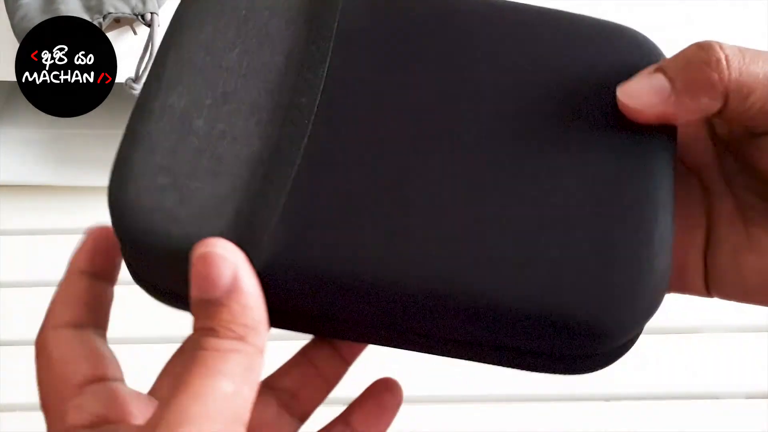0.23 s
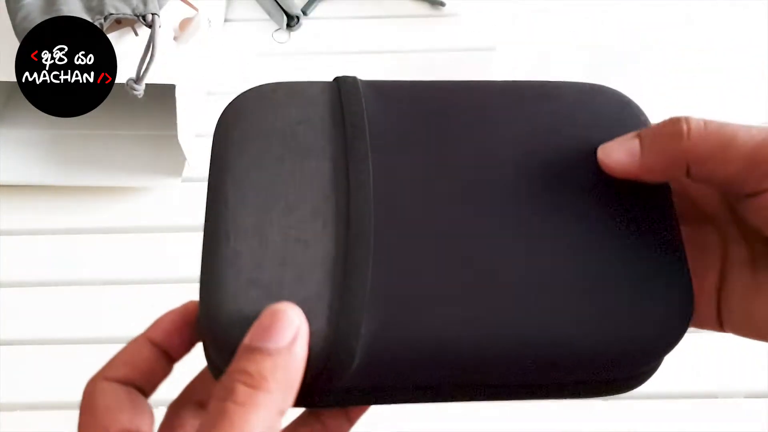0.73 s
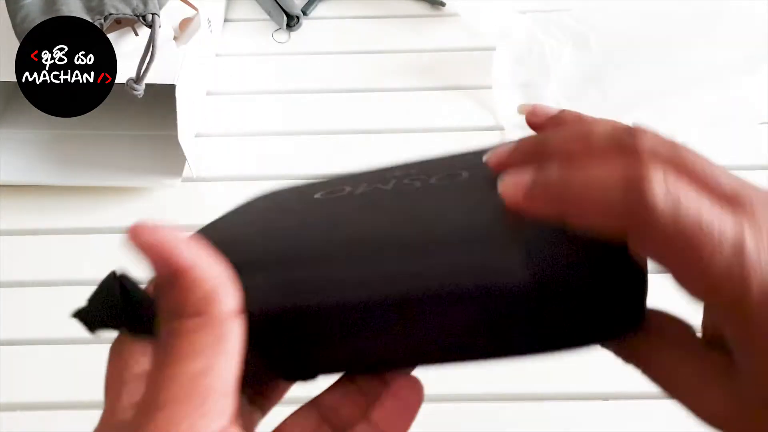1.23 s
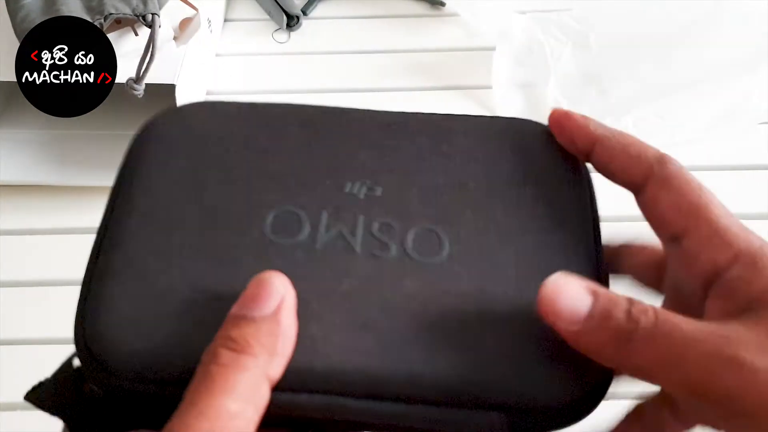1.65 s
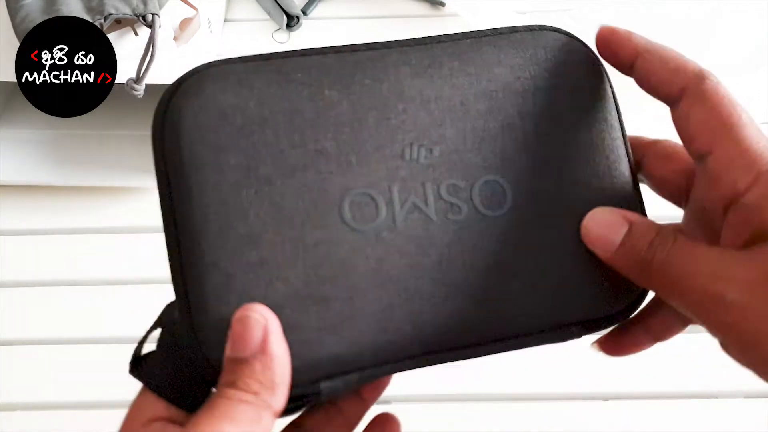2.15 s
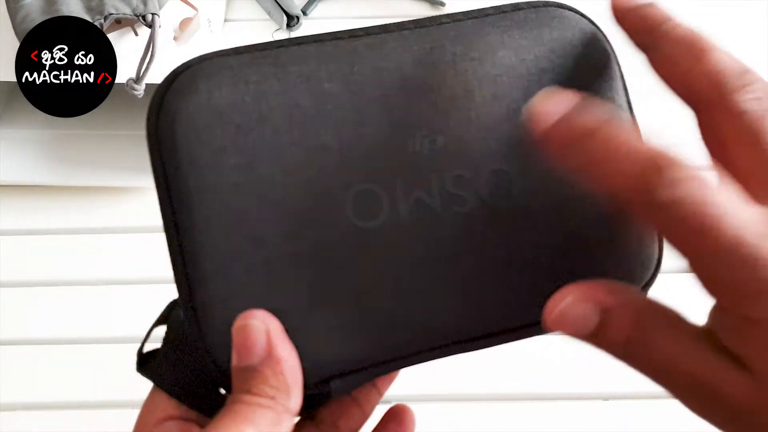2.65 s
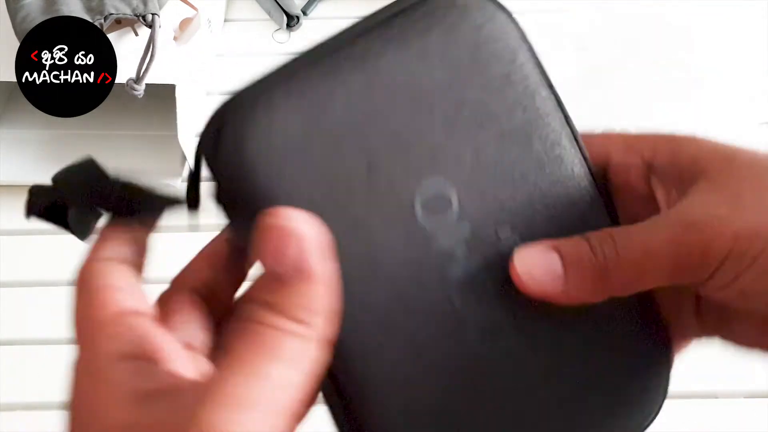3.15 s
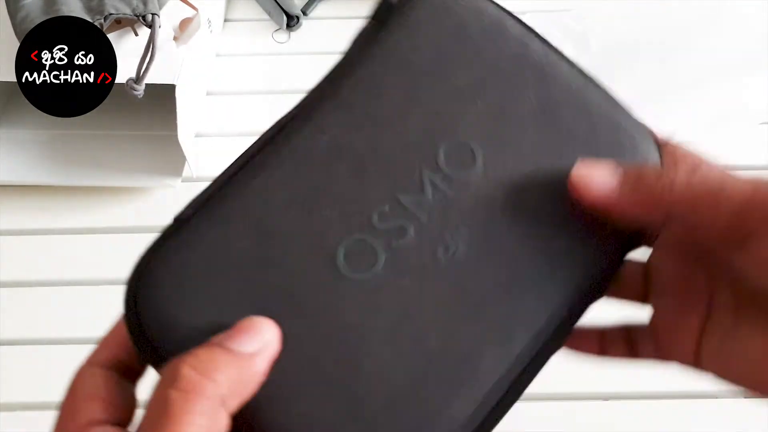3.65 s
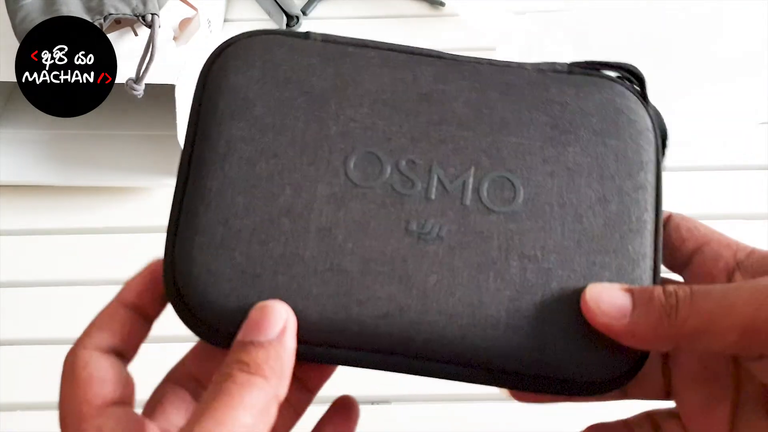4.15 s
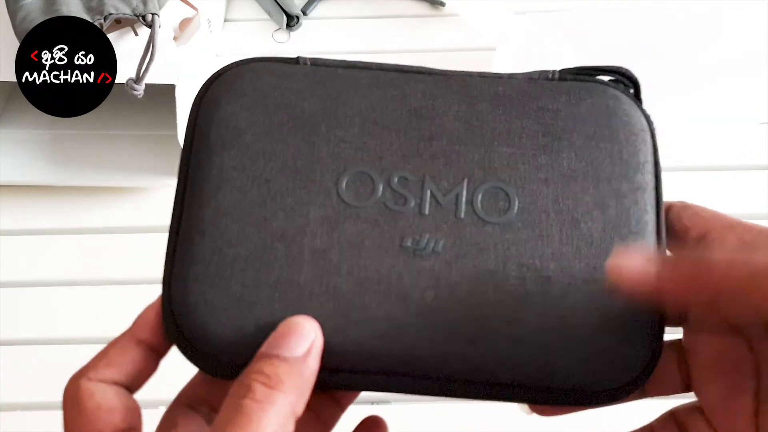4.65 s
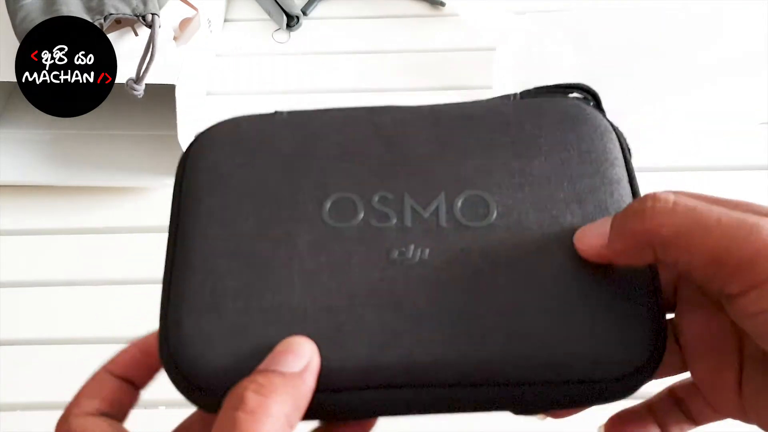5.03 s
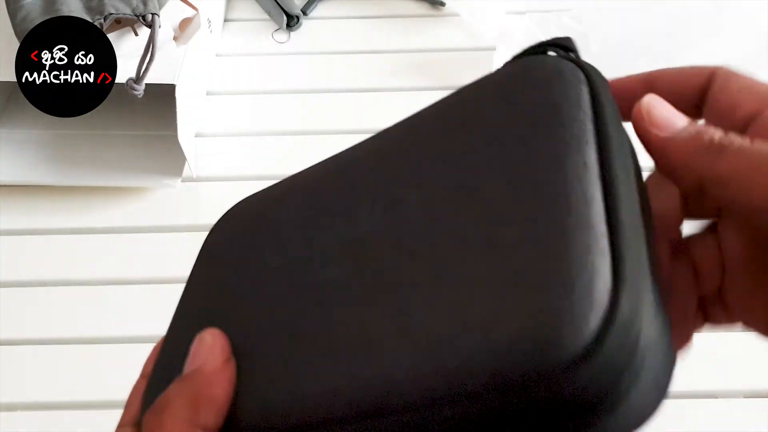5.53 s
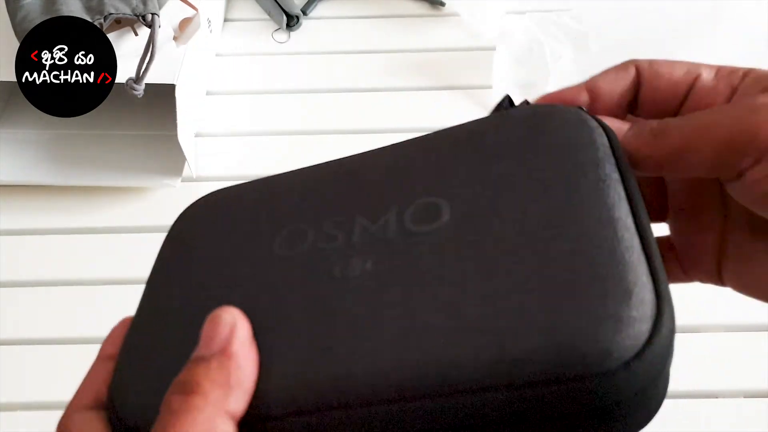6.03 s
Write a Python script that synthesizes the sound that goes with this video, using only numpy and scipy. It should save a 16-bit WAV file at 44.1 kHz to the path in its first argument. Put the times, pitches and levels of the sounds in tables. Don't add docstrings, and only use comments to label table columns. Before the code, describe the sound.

Close stereo pickup of a hard, cloth-covered case handled in a small room, with very quiet low room tone and hiss. From 0 to 0.5 s, fingers rub the cloth while pulls and contents rattle in quick clicks, the sharpest near 0.27. Lighter shuffling follows, with knocks around 1.0 to 1.13, a soft regrip at 1.34 and a stronger cloth rub with tiny squeaks at 1.55 to 1.75. It calms until two firm, short hollow finger taps with nail ticks at 2.49 and 2.68. A knock comes near 2.8, then a dense clatter of zip pulls and a brief rasp at 3.3 to 3.5, trailing into rubbing. Small bumps sound at 4.1, and quiet touches lead to a lighter double-contact tap at 4.87. Soft pads, scuffs and muted knocks at 5.15 to 5.7 fade into faint strap rubbing and small clicks around 6 s.

```python
import sys
import numpy as np
from scipy import signal
from scipy.fft import rfft, irfft, next_fast_len
from scipy.io import wavfile
from scipy.ndimage import uniform_filter1d, map_coordinates

SR = 44100
rng = np.random.default_rng(int(sys.argv[2]) if len(sys.argv) > 2 else 0)


def pcm_store(signal):
    levels = np.round(np.clip(np.atleast_2d(signal), -1, 1) * 32767)
    wavfile.write(sys.argv[1], SR, levels.astype(np.int16).T)


def amplitude_ratio(level_db):
    exponent = np.asarray(level_db, float) / 20
    return 10 ** exponent


N = 277389


def unit(x):
    return x / np.sqrt(np.mean(x ** 2) + 1e-20)


def along(points, hz):
    point_hz, value = np.transpose(points)
    return np.interp(np.log(hz + 1), np.log(point_hz + 1), value)


def wobble(rate_hz):
    knots = rng.standard_normal(int(N * rate_hz / SR) + 4)
    return map_coordinates(knots, [np.arange(N) * rate_hz / SR])


def filtered(x, response):
    size = next_fast_len(N + SR // 2)
    hz = np.fft.rfftfreq(size, 1 / SR)
    return irfft(rfft(x, size) * response(hz), size)[..., :N]


def add(track, start_s, piece):
    track[..., round(start_s * SR):][..., :piece.shape[-1]] += piece


# hz, correlation
LIKENESS = [(60, 0.95), (290, 0.89), (640, 0.49), (1400, 0.059), (3100, 0.035), (15000, 0.064)]


def rush(spectrum, grain_db=0., grain_rate_hz=700, patchy_db=0.):
    z = signal.stft(rng.standard_normal((2, N)), nperseg=512)[2]
    patches = uniform_filter1d(rng.standard_normal(z.shape[1:]), size=3, axis=0)
    patches = uniform_filter1d(patches, size=6, axis=1)
    pair = signal.istft(z * amplitude_ratio(patchy_db * unit(patches)), nperseg=512)[1][:, :N]
    pair = pair * amplitude_ratio(grain_db * wobble(grain_rate_hz))

    def mid_side(hz):
        turn = np.arccos(np.clip(along(LIKENESS, hz), -1, 1)) / 2
        return amplitude_ratio(along(spectrum, hz)) * [np.cos(turn), np.sin(turn)]

    mid, side = filtered(pair, mid_side)
    return unit(np.array([mid + side, mid - side]))


# hz, density_db_per_hz
ROOM_TONE = [(22, -47), (48, 3.5), (62, 1), (78, -17.5), (98, -1), (125, -8.5), (190, -9), (350, -21.5)]
# hz, density_db_per_hz
HISS = [(800, -32.5), (1400, -38.5), (5700, -48.5), (8000, -52.5), (9500, -52), (11900, -43),
        (16000, -47.5)]


def air():
    drift = amplitude_ratio(1.2 * wobble(5))
    return amplitude_ratio(-56.9) * drift * rush(ROOM_TONE + HISS, patchy_db=-0.8)


# hz, t60_s
ROOM_T60 = [(120, 0.31), (350, 0.55), (800, 0.43), (2000, 0.14), (5000, 0.41), (12000, 0.32)]
# hz, level_db
ROOM_TINT = [(100, -8.5), (300, -10.5), (700, -1.5), (1500, 5.5), (4000, 7.5), (8300, -2), (12000, 2.5)]


def room(x):
    out = np.zeros((2, N + SR))
    step = SR * 19 // 100
    for start in range(0, N, step):
        hz, t, z = signal.stft(rng.standard_normal((3, SR // 3)), SR, nperseg=256)
        z = z[:2] + z[2] * 2.8 * (hz < 500)[:, None]
        decay = amplitude_ratio(along(ROOM_TINT, hz)[:, None] - 60 * t / along(ROOM_T60, hz)[:, None])
        tail = signal.istft(z * decay, SR, nperseg=256)[1]
        tail = tail / np.linalg.norm(tail[0])
        add(out, start / SR + 0.007, signal.fftconvolve(x[:, start:start + step], tail, axes=1))
    return out[:, :N]


# delay_ms, signed_share
REFLECTIONS = [(7.7, -.037), (9.5, .057), (10.68, -.145), (12.93, -.045), (15.44, -.086), (16.08, .047),
               (22.47, .077), (25.56, .06), (31.02, -.073), (32.5, .037), (35.17, -.04), (35.65, -.109),
               (38.23, .059), (42.34, .035), (42.86, .082), (43.54, .035), (51.8, .043), (66.53, -.047),
               (78.5, -.067), (102.3, .035)]


def walls(x):
    delay_ms, share = np.transpose(REFLECTIONS)
    copies = np.zeros(SR // 8)
    copies[(delay_ms * SR / 1000).astype(int)] = share
    late = signal.fftconvolve(x, copies[None], axes=1)[:, :N]
    level_db, dull_hz = 0.1, 1300
    return filtered(late, lambda hz: amplitude_ratio(level_db) / (1 + 1j * hz / dull_hz))


# start_s, length_s, low_hz, top_hz, level_db
RASPS = [
    (3.33, .11, 1900, 4800, -48),
    (0.74, 0.25, 5200, 6800, -79.5),
    (5.98, 0.28, 3500, 7400, -70),
    (3.4, 0.27, 500, 1200, -66),
    (3.6, 0.1, 700, 1500, -59),
    (1.51, .14, 1100, 4200, -58),
    (5.222, .05, 900, 2700, -61),
    (2.15, 0.082, 1900, 2500, -79),
    (4.25, 0.11, 390, 520, -62),
]


def rasps():
    out = np.zeros((2, N + SR))
    lead, grain_db = 0.46, 3.0
    hz = np.fft.rfftfreq(SR // 3, 1 / SR) + 1
    for start_s, length_s, low_hz, top_hz, level_db in RASPS:
        u = np.linspace(0, 1, round(length_s * SR))
        chance = rng.standard_normal((4, SR // 3))
        uneven = unit(uniform_filter1d(chance[3], size=70))
        grains = (chance[0] + chance[1:3]) * amplitude_ratio(grain_db * uneven)
        band = irfft(rfft(grains) / (1 + (low_hz / hz) ** 4) / (1 + (hz / top_hz) ** 14))
        add(out, start_s, amplitude_ratio(level_db) * unit(band)[:, :len(u)] * np.sin(np.pi * u ** lead) ** 2)
    return out[:, :N]


# start_s, length_s, from_hz, to_hz, level_db
SQUEALS = [(1.534, 0.055, 1652, 1428, -51.5), (1.57, 0.041, 1377, 1222, -48.5),
           (1.596, 0.038, 1158, 780, -55), (1.536, 0.07, 3290, 2900, -58),
           (1.549, 0.062, 2294, 1663, -52.5), (1.734, 0.034, 874, 2770, -54.5),
           (3.261, 0.041, 943, 873, -53), (3.592, 0.085, 1880, 1420, -61), (3.949, 0.078, 659, 878, -59.5),
           (4.38, 0.063, 2265, 2185, -73), (5.214, 0.051, 1008, 2590, -59.5),
           (5.461, 0.044, 1477, 1420, -67), (6.031, 0.14, 2910, 3140, -65.5)]


def squeals():
    out = np.zeros((2, N + SR))
    for start_s, length_s, from_hz, to_hz, level_db in SQUEALS:
        u = np.linspace(0, 1, round(length_s * SR))
        phase = 2 * np.pi * np.cumsum(from_hz + (to_hz - from_hz) * u) / SR
        rough = uniform_filter1d(rng.standard_normal((4, len(u))), size=130, axis=1)
        band = rough[:2] * np.cos(phase) + rough[2:] * np.sin(phase)
        add(out, start_s, amplitude_ratio(level_db) * unit(band) * np.sin(np.pi * u))
    return out[:, :N]


def swells(top_s, rise_s, fall_s, level_db, shape):
    t = np.arange(0, N + 64, 64) / SR
    late = t - top_s[:, None]
    far = np.where(late < 0, -late / np.reshape(rise_s, (-1, 1)), late / fall_s[:, None])
    power = amplitude_ratio(level_db[:, None] - 22 * far ** shape) ** 2
    return np.interp(np.arange(N) / SR, t, np.sqrt(power.sum(axis=0)))


def power_sum(*gains):
    return np.sqrt(sum(gain ** 2 for gain in gains))


# fastest_s, rise_s, fall_s, weave_db, skin_over_weave_db
SLIDES = [(0.06, 0.57, 0.41, -61, -13.5), (0.32, 0.26, .14, -65, -8.5), (0.98, 0.095, 0.24, -56, -3.5),
          (1.1, 0.21, 0.14, -57, -8), (1.26, 0.079, 0.25, -66.5, -8.5), (1.576, 0.15, .12, -51.5, -6),
          (1.789, 0.099, 0.11, -58, -6.5), (1.99, 0.18, 0.14, -67, -6), (2.25, 0.065, 0.12, -75, 0),
          (3.02, 0.076, 0.21, -61.5, -12), (3.11, 0.2, 0.18, -78, 0), (3.28, 0.035, 0.049, -66.5, -4),
          (3.36, 0.065, 0.17, -58, -4), (3.5, 0.045, 0.096, -53.5, -7.5), (3.638, 0.16, 0.1, -55.5, -9),
          (3.8, 0.3, 0.4, -71.5, -2.5), (4.01, 0.11, 0.13, -67.5, -3), (4.12, 0.036, 0.067, -76.5, 3),
          (5.169, 0.062, 0.32, -62.5, -10), (5.388, 0.14, 0.21, -70.5, -2.5),
          (5.64, 0.085, 0.26, -74.5, -10), (5.81, 0.038, 0.11, -72, -10), (5.98, 0.016, 0.2, -64.5, -10),
          (6.1, 0.11, .2, -63.5, -7)]
# start_s, drag_db, fall_s, creak_over_drag_db
JOLTS = [(0.0, -51, 0.13, -9), (0.111, -51.5, 0.21, 0.5), (0.262, -48.5, 0.18, -2.5),
         (0.431, -56, 0.13, -12), (0.604, -64, 0.24, 4), (0.875, -76, 0.091, 17.5),
         (1.13, -59.5, 0.13, 6.5), (1.68, -57, 0.077, 7), (2.502, -46.5, 0.18, 7), (2.69, -49.5, 0.32, 7.5),
         (3.08, -54, 0.12, 0), (3.301, -51.5, 0.44, -6.5), (3.342, -41.5, 0.083, -11),
         (3.441, -45.5, 0.17, -6), (3.63, -59, 0.5, 2.5), (4.097, -49.5, 0.14, -13), (4.294, -66.5, .1, 6),
         (4.389, -67.5, 0.16, -18.5), (4.508, -67, 0.11, 3), (4.881, -53, 0.24, 8),
         (5.152, -54.5, 0.29, 3.5), (5.37, -71.5, 0.058, 20), (5.669, -64, 0.14, 11.5),
         (5.798, -65, 0.082, 16), (5.97, -68, 0.098, -2)]
# time_s, creak_db
HOLD = [(0, -60.5), (0.5, -69), (0.85, -67), (1.3, -68), (1.9, -64.5), (2.2, -64.5), (2.4, -76), (2.9, -59),
        (3.22, -72), (3.7, -73.5), (4.0, -61.5), (4.3, -68.5), (4.65, -77.5), (5.1, -68), (5.5, -66),
        (5.903, -69), (6.1, -55.5), (6.29, -83)]
# hz, level_db
GRIP = [(90, -15), (200, 9), (350, 7.5), (650, 3.5), (1100, -29.5)]
# hz, level_db
DRAG = [(450, -21.5), (800, 1.5), (1300, -1.5), (2100, -5), (2900, -7), (4600, -27), (5600, -31.5)]
# hz, level_db
WEAVE = [(1800, 1.5), (3000, 2), (4500, 2), (6500, 3.5), (7700, -4), (9000, -35.5)]
# hz, level_db
SKIN = [(6500, -28.5), (8300, -17.5), (10500, -8), (12500, -12), (15500, -24.5), (17000, -15)]


def hands():
    top_s, rise_s, fall_s, weave_db, skin_db = np.transpose(SLIDES)
    slide = swells(top_s, rise_s, fall_s, weave_db, 1.58)
    dry_slide = swells(top_s, rise_s, fall_s, weave_db + skin_db, 1.58)
    jolt_s, drag_db, settle_s, creak_db = np.transpose(JOLTS)
    jolt_rise_s = 0.0081
    shuffle = swells(jolt_s, jolt_rise_s, settle_s, drag_db, 0.95)
    creak = swells(jolt_s, jolt_rise_s, settle_s, drag_db + creak_db, 1.0)
    hold = amplitude_ratio(np.interp(np.arange(N) / SR, *np.transpose(HOLD)))

    clump = wobble(60)
    grip = amplitude_ratio(-1.5 + 1.5 * wobble(25)) * rush(GRIP, grain_db=1.5, grain_rate_hz=150, patchy_db=1.5)
    drag = amplitude_ratio(-1.5 + 1.3 * clump) * rush(DRAG, grain_db=2.6, grain_rate_hz=450, patchy_db=2.2)
    weave = amplitude_ratio(-2.1 + 1.42 * clump) * rush(WEAVE, grain_db=1.5, patchy_db=1.8)
    skin = amplitude_ratio(3.0 + 0.8 * clump) * rush(SKIN, grain_db=1.5)

    out = power_sum(hold, creak, amplitude_ratio(-9) * slide) * grip
    out += power_sum(shuffle, amplitude_ratio(-1) * slide) * drag
    out += power_sum(slide, amplitude_ratio(-17) * shuffle) * weave
    return out + dry_slide * skin + squeals()


# start_s, level_db, pitch_hz
BUMPS = [
    (0.068, -45, 260),
    (0.145, -41, 270),
    (1.34, -38.5, 244),
    (1.685, -42, 214),
    (4.8665, -36, 500),
    (4.874, -34.5, 260),
    (5.149, -39, 303),
    (5.364, -40, 405),
]


def bumps():
    out, t = np.zeros(N + SR), np.arange(SR // 16) / SR
    for start_s, level_db, pitch_hz in BUMPS:
        u = t * pitch_hz / 0.82
        add(out, start_s, -amplitude_ratio(level_db + 6.0) * u * np.exp(-u) * np.sin(2 * np.pi * pitch_hz * t))
    return out[:N]


# centre_hz, width_hz, signed_strength
SHELL_MODES = [(267, 70, .84), (358, 81, 1.2), (639, 84, .28), (724, 110, -.2), (1210, 116, -.56),
               (1403, 86, -.35), (2870, 395, .17)]


def shell(hz):
    modes = 0
    for centre_hz, width_hz, strength in SHELL_MODES:
        damping = 1j * hz * width_hz
        modes = modes + strength * damping / (centre_hz ** 2 - hz ** 2 + damping)
    return modes * 1j * hz / (85 + 1j * hz)


# start_s, peak_db, ring_hz, crack_db
THUDS = [(0.055, -34, 1040, -8), (0.097, -39, 1170, -1.5), (0.714, -50, 500, -19), (1.1325, -42, 2350, -8),
         (1.337, -50, 860, -6), (1.634, -40.5, 2200, -6), (1.981, -42, 740, -12), (2.7945, -38.5, 980, -3),
         (3.0855, -38, 1840, -10), (3.4435, -35, 1000, -9), (3.477, -35, 2100, -22),
         (3.493, -37, 1500, -16), (4.095, -41.5, 1660, -7), (4.108, -32.5, 1650, -28),
         (4.29, -47, 1290, -8.5), (4.504, -50.5, 2440, -17), (4.655, -56, 2640, -11),
         (4.76, -57.5, 820, -2), (4.8915, -30, 1213, -5.5), (5.164, -43, 1930, -11),
         (5.67, -36.5, 750, -18), (5.688, -40, 830, -9.5), (5.935, -49.5, 1410, -5.5),
         (6.05, -44.5, 980, -23), (6.199, -52, 830, -1.5)]
# start_s,
# peak_db, ring_hz, crack_db
KNOCKS = [(0.005, -42, 1350, -10), (0.026, -41, 1770, -11), (0.061, -35.5, 870, -8.5),
          (0.124, -37.5, 1450, -3.5), (0.132, -40, 790, -4.5), (0.332, -39.5, 1470, -1.5),
          (0.601, -50, 720, -27), (0.638, -50.5, 1350, -28), (0.872, -51.5, 794, -25),
          (1.0, -37.5, 1410, -9.5), (1.082, -45, 1510, -13), (1.128, -38.5, 1530, -5.5),
          (1.669, -46, 774, -25), (1.748, -40.5, 1960, -5.5), (1.99, -42.5, 675, -7.5),
          (2.97, -49.5, 800, -15), (3.305, -40, 1240, -33), (3.536, -52, 2870, -10),
          (3.847, -59, 2490, -9.5), (4.384, -49.5, 1470, -13), (5.203, -55, 1780, -16),
          (5.074, -58, 1000, -6.5), (5.797, -44, 780, -21.5), (5.973, -43, 1150, -6.5),
          (4.231, -51.5, 1430, -14), (2.4922, -30, 2450, -9), (2.4952, -33, 2100, -9),
          (2.4972, -36, 2900, -9), (2.6818, -34, 1950, -12), (2.6853, -34, 2000, -12),
          (4.8675, -40, 2300, -12), (0.18, -47, 1100, -8), (0.199, -47, 1300, -8), (0.308, -45, 1500, -8),
          (0.352, -45, 900, -8), (3.3505, -36, 2300, -8)]
# start_s, peak_db, ring_hz, crack_db
CLINKS = [(0.118, -34.5, 655, -13), (0.1575, -35, 1500, -7.5), (0.26, -39, 1330, -11),
          (0.272, -35, 2110, -2.5), (0.2745, -25, 1350, -13.5), (1.1328, -29, 5170, -12.5),
          (0.424, -43, 715, -7), (0.444, -40, 700, -15), (1.649, -43, 2200, -24), (3.018, -43, 730, -4.5),
          (3.321, -40, 1690, -4), (3.341, -34, 1310, -5), (3.3438, -19, 1230, -13), (3.351, -30, 1340, -10),
          (3.356, -24.5, 1430, -13.5), (3.369, -42, 1490, -6), (3.428, -36.5, 1360, -6),
          (3.449, -41, 1100, -9), (3.498, -37, 875, -11), (4.895, -38.5, 1860, -3),
          (3.458, -39, 1310, -7.5), (3.511, -40, 2280, -4), (3.939, -52.5, 1120, -4),
          (3.971, -47, 720, -30), (4.103, -36, 830, -9), (4.146, -40.5, 1720, -13), (4.203, -47, 1430, -29),
          (5.173, -40, 710, -23), (5.277, -47, 1500, -2), (6.04, -47, 1100, -7), (0.045, -49, 1100, -6),
          (0.139, -40.5, 1400, -5.5), (0.263, -39, 890, -8), (0.2735, -36, 4400, -10),
          (0.274, -41, 7000, -20), (1.2445, -38, 2010, -4.5), (3.3445, -29, 3400, -14),
          (3.357, -34, 3600, -11), (3.36, -38, 1500, -8), (3.375, -39, 1300, -6), (3.466, -44, 1300, -7),
          (3.606, -45, 1750, -9), (4.18, -50, 2095, -12), (5.146, -49, 1090, -4), (5.185, -51, 1134, -8),
          (5.231, -48, 1800, -10), (5.245, -45, 950, -9), (5.283, -44, 674, -7)]
# hz, level_db
CRACK = [(1200, 6.5), (2400, 1.5), (4400, -15), (5400, -14.5), (8000, -30)]
# hz, level_db
TICK = [(1500, -3.5), (3500, 12), (6000, 1), (8300, -9), (11500, -6.5), (16000, -23.5)]


def rattle():
    ring, push, crack, tick = np.zeros((4, 2, N + SR))
    t = np.arange(900) / SR
    thump_pulse = (t / 0.00032) ** 2 * np.exp(-t / 0.00019)
    crack_rise = 1 - np.exp(-t / 0.0016)
    for parts, thump_db in [(THUDS, 2), (KNOCKS, -10.5), (CLINKS, -40)]:
        for start_s, peak_db, ring_hz, crack_db in parts:
            chance = rng.standard_normal((5, len(t)))
            side = amplitude_ratio(np.array([[1.5], [-1.5]]) * chance[0, 0])
            life = amplitude_ratio(-60 * t * ring_hz / 6.9) * (1 - np.exp(-t * ring_hz / 0.5)) ** 2
            add(ring, start_s, side * amplitude_ratio(peak_db + 7.5) * life * np.sin(2 * np.pi * ring_hz * t))
            add(push, start_s, -side * amplitude_ratio(peak_db + thump_db + 12) * thump_pulse)
            crack_gain = amplitude_ratio(peak_db + crack_db + 12 - 60 * t / 0.011) * crack_rise
            add(crack, start_s, side * crack_gain * (chance[1] + 0.71 * chance[2:4]))
            tick_gain = amplitude_ratio(peak_db + 1.97 * crack_db + 1.0 - 60 * t / 0.0024)
            add(tick, start_s, tick_gain * chance[3:])
    thump = filtered(push[:, :N], shell)
    brittle = filtered(crack[:, :N], lambda hz: amplitude_ratio(along(CRACK, hz)))
    edge = filtered(tick[:, :N], lambda hz: amplitude_ratio(along(TICK, hz)))
    return ring[:, :N] + thump + brittle + edge


# start_s, blow_db, contact_ms, second_delay_ms, second_signed_share
TAPS = [
    (2.49203, -14.3, 0.785, 2.93, 0.27),
    (2.68142, -9.9, 0.61, 3.44, -0.45),
    (4.86804, -26.7, 0.575, 0.75, -3.7),
]
SLAPS_DB = [-16, -14.5, -37]
# start_s, level_db
NAIL_TOUCHES = [
    (2.4928, -32.5),
    (2.4951, -39),
    (2.4971, -37),
    (2.6822, -28),
    (2.6855, -21),
    (4.8915, -52),
]
# hz, level_db
NAIL = [(7500, -27), (10500, -0.5), (13000, -1), (16200, -3.5), (17200, -40.5)]
# hz, left_over_right_db
TAP_LEAN = [(1000, -1), (9000, 0), (13000, -4.5)]


def taps():
    push, t = np.zeros(N + SR), np.arange(600) / SR
    slap, nail = np.zeros((2, 2, N + SR))
    for start_s, level_db in NAIL_TOUCHES:
        add(nail, start_s, amplitude_ratio(level_db - 60 * t / 0.0034) * rng.standard_normal((2, len(t))))
    for (start_s, blow_db, contact_ms, delay_ms, share), slap_db in zip(TAPS, SLAPS_DB):
        u = t / (contact_ms / 6000)
        pulse = u * u * np.exp(-u)
        second_s = start_s + delay_ms / 1000
        add(push, start_s, -amplitude_ratio(blow_db + 19) * pulse)
        add(push, second_s, -share * amplitude_ratio(blow_db + 12.5) * pulse)
        for contact_s in (start_s, second_s):
            add(slap, contact_s, amplitude_ratio(slap_db - 7 - 60 * t / 0.0091) * rng.standard_normal((2, len(t))))

    def skin_edge(hz):
        thin = 3 * (hz / (hz + 9000)) ** 2 / (1 + (hz / 8000) ** 6)
        return amplitude_ratio(along(TICK, hz)) * thin

    edge = filtered(slap[:, :N], skin_edge) + filtered(nail[:, :N], lambda hz: amplitude_ratio(along(NAIL, hz)))
    blows = filtered(push[:N], shell) + edge
    return filtered(blows, lambda hz: amplitude_ratio(along(TAP_LEAN, hz) * np.array([[0.5], [-0.5]])))


def scene():
    blows = taps()
    small = rattle() + bumps()
    answers = room(amplitude_ratio(-13.5) * blows + amplitude_ratio(-7.5) * small) + walls(blows + small)
    steady = small + answers + hands() + rasps() + air()
    return blows + filtered(steady, lambda hz: hz < 15800)


def low_pass(x):
    return signal.sosfilt(signal.butter(12, 16840, fs=SR, output="sos"), x)


# hz, left_over_right_db
PORT_LEAN = [(60, 5), (250, 4), (500, 6.5), (1500, 7), (5000, 4.5), (9000, 3), (13000, 2.5)]


def record(dry):
    def capsule(hz):
        lean = amplitude_ratio(along(PORT_LEAN, hz) * np.array([[0.5], [-0.5]]))
        return lean * (1j * hz / (25 + 1j * hz)) ** 2

    return low_pass(filtered(dry, capsule))


dry = scene()
out = record(dry)
pcm_store(out)
```